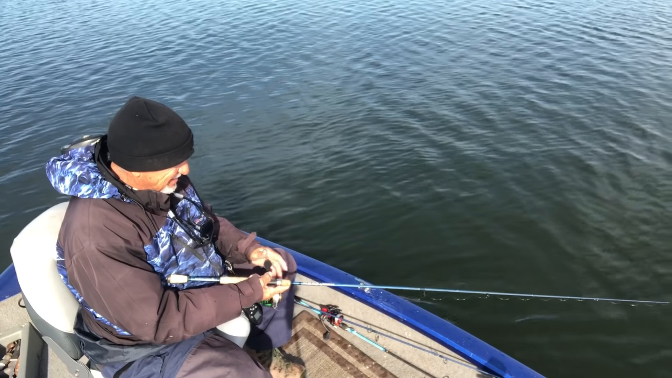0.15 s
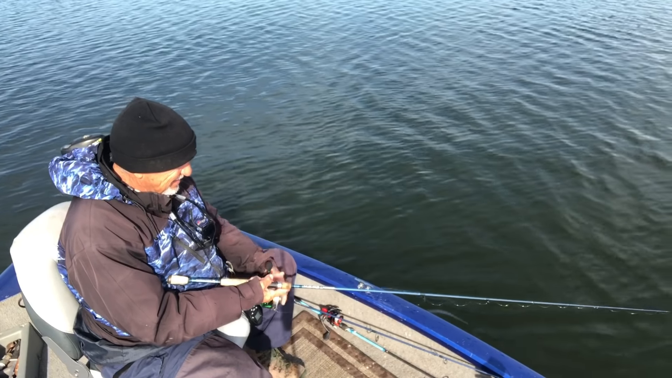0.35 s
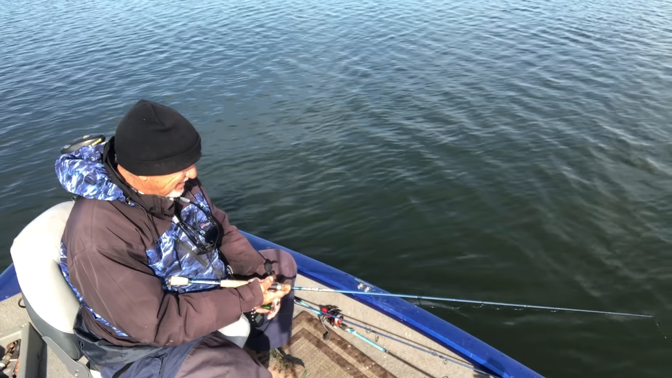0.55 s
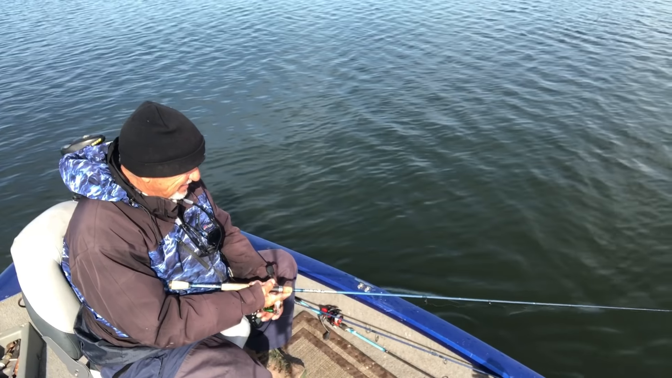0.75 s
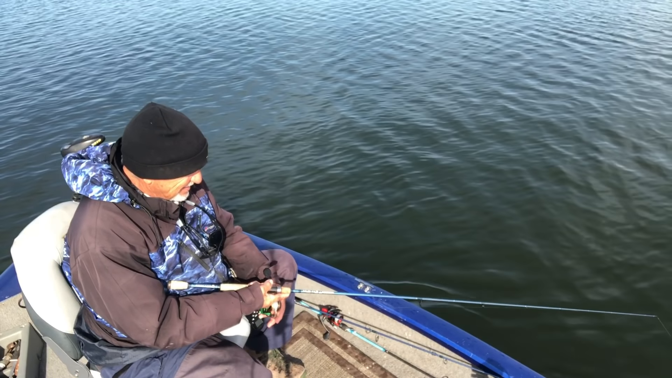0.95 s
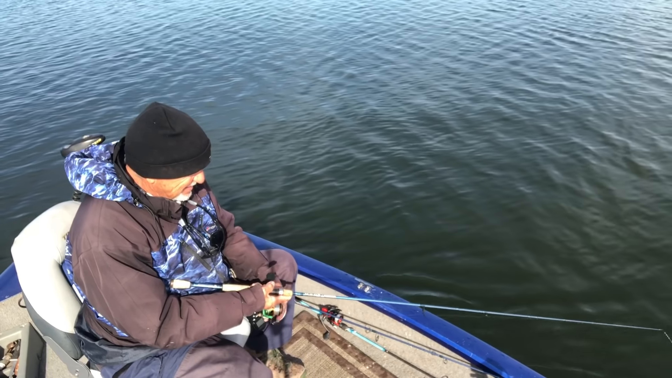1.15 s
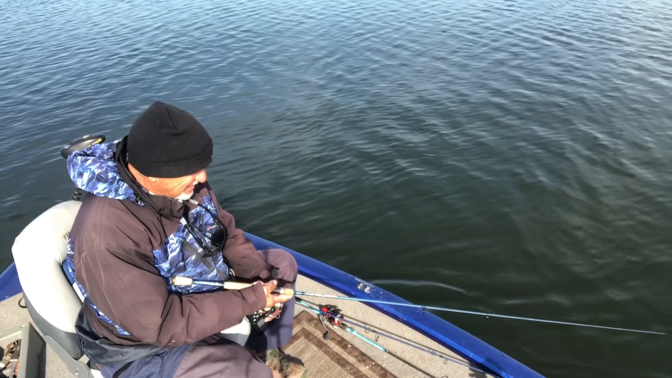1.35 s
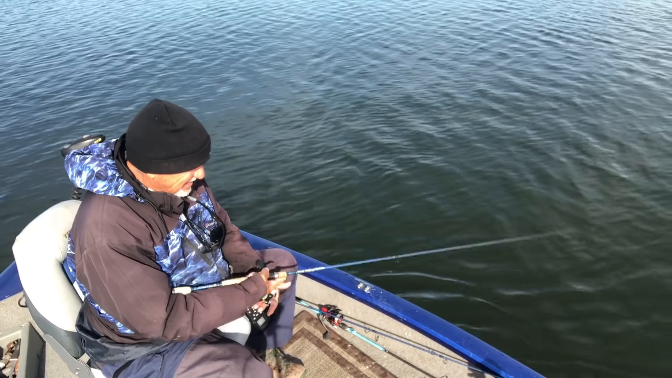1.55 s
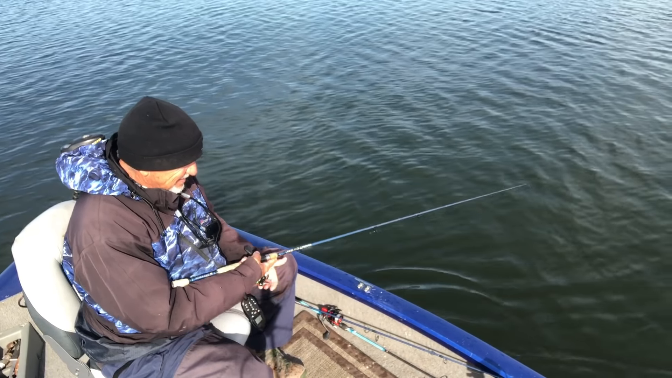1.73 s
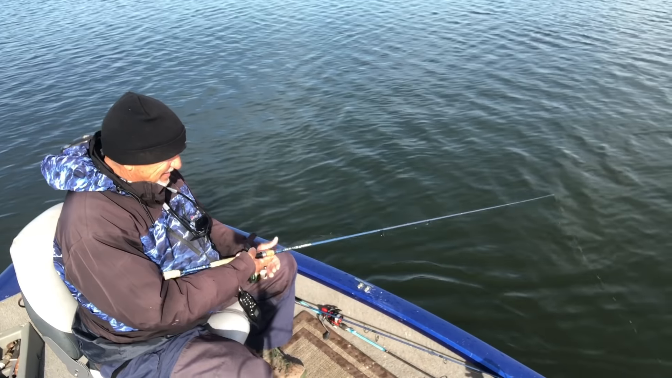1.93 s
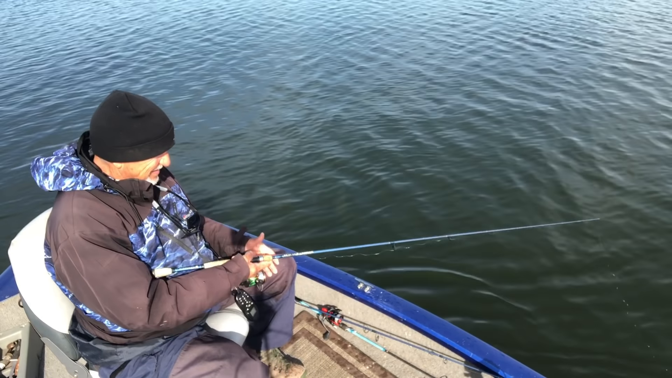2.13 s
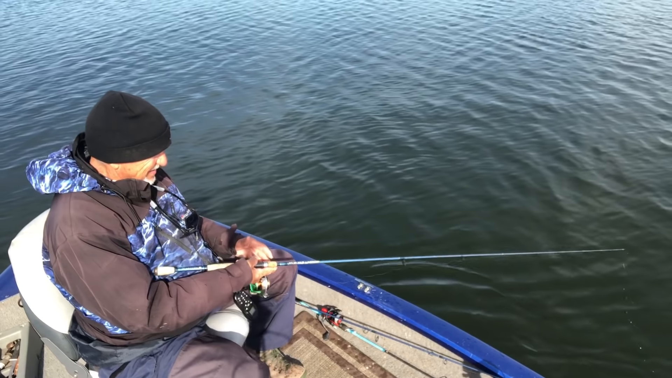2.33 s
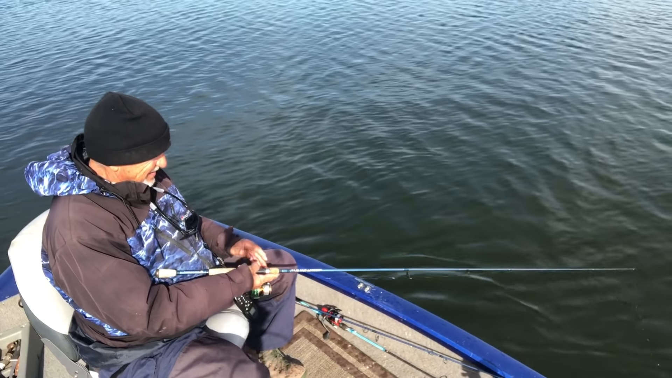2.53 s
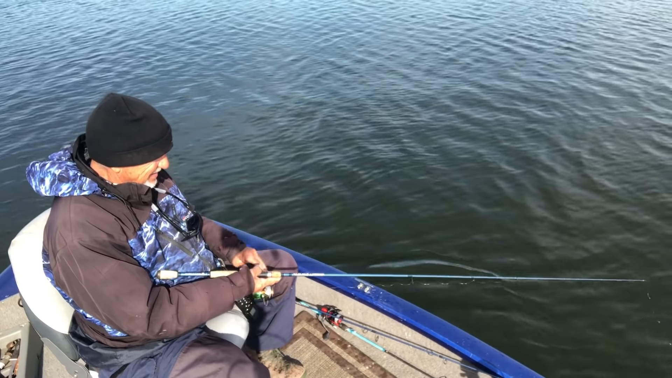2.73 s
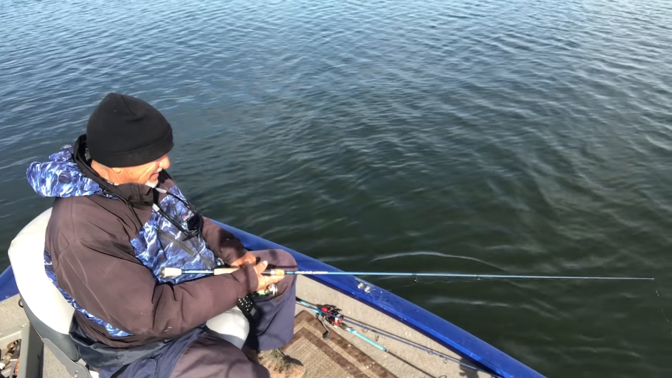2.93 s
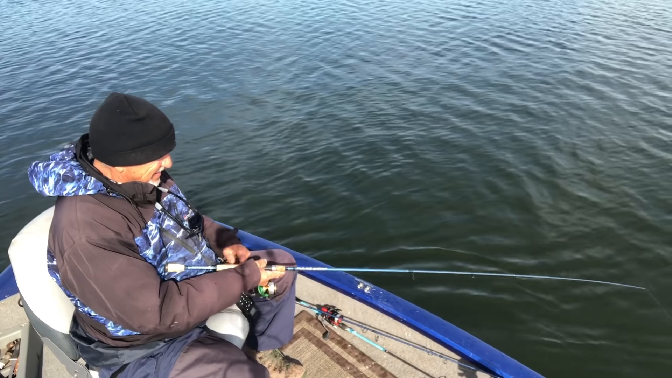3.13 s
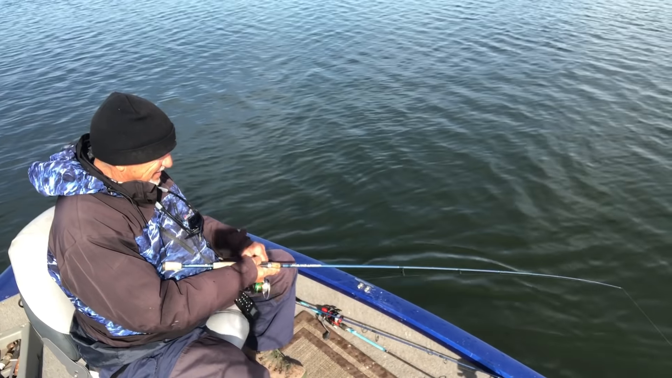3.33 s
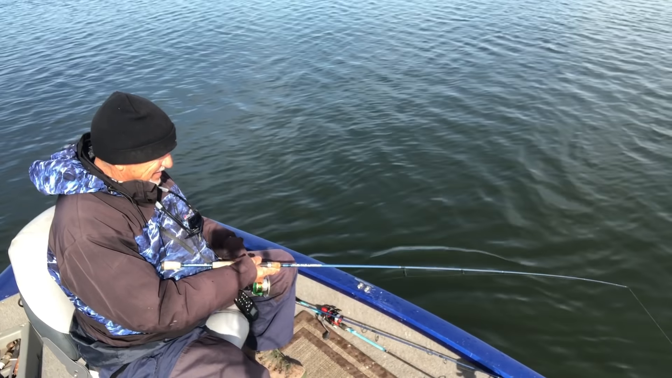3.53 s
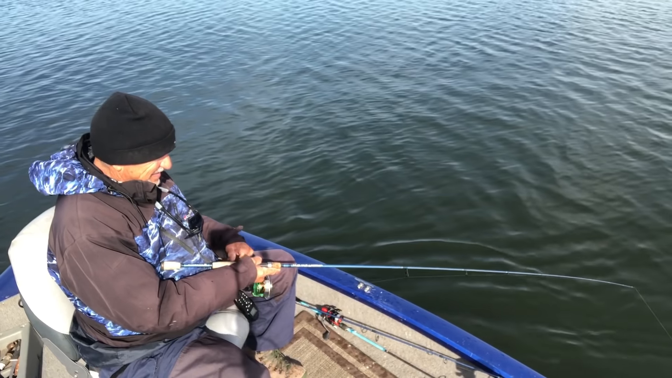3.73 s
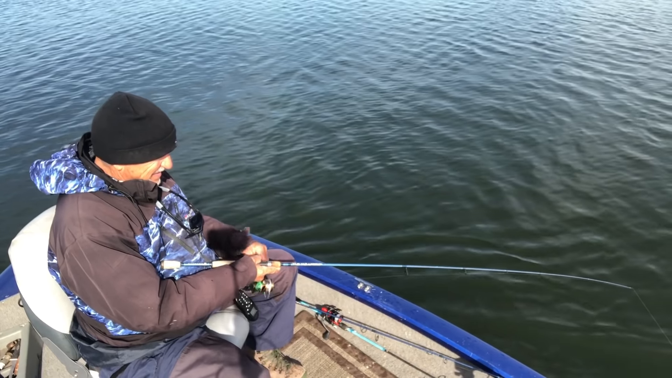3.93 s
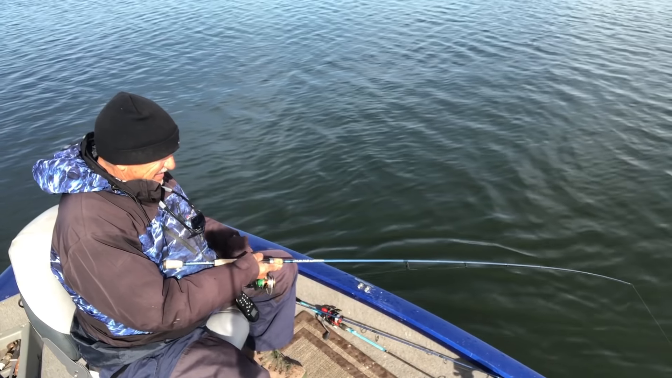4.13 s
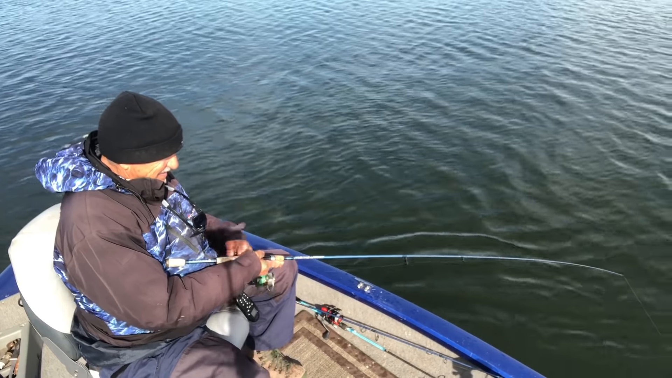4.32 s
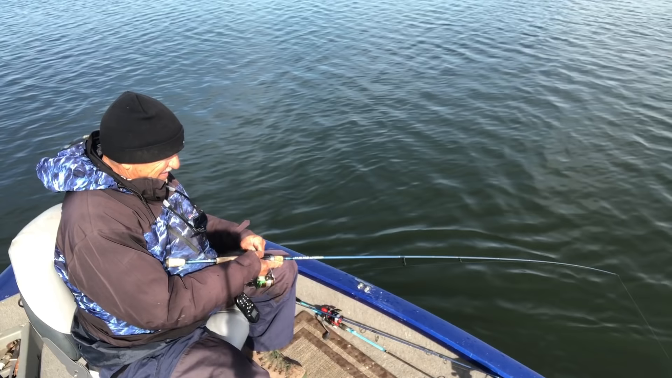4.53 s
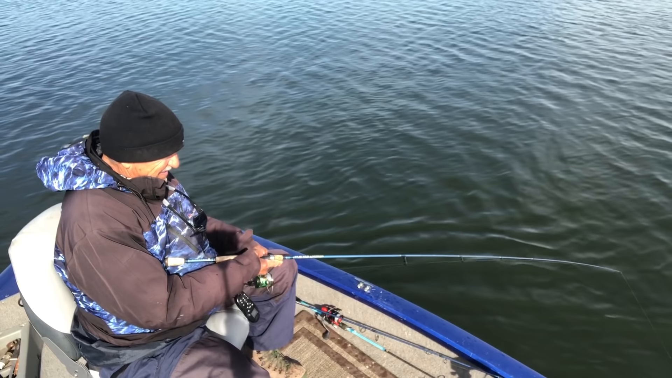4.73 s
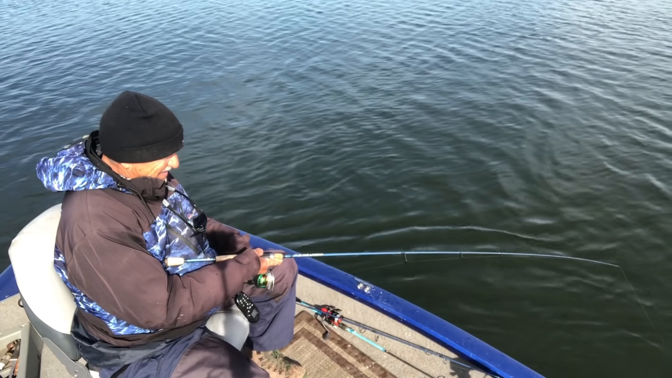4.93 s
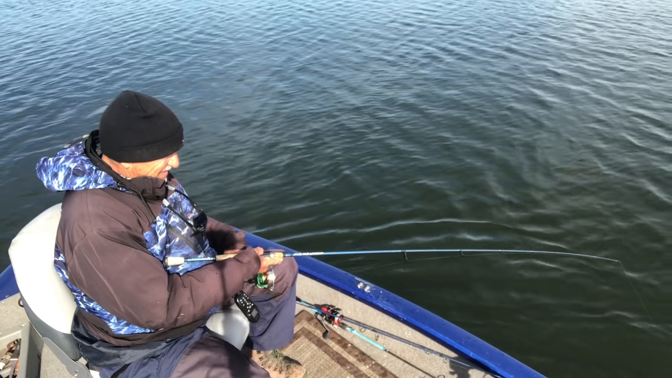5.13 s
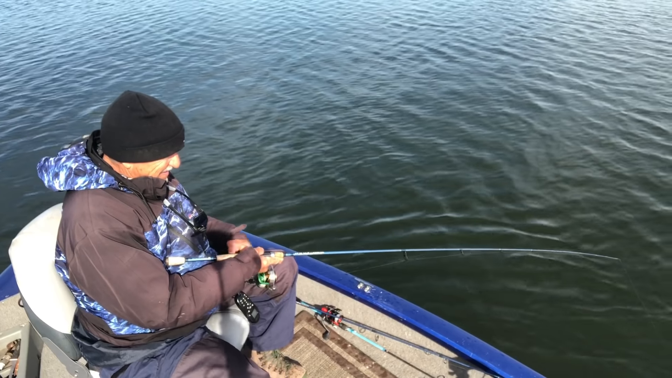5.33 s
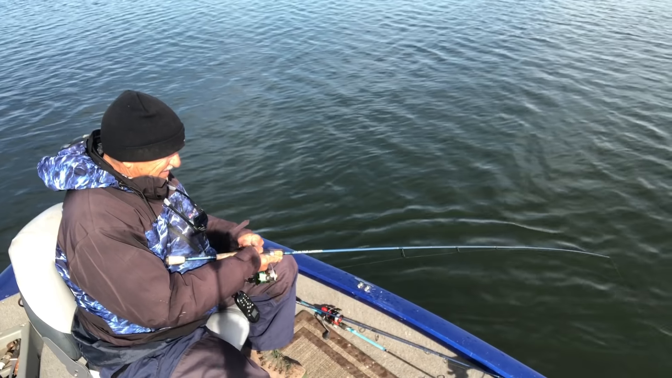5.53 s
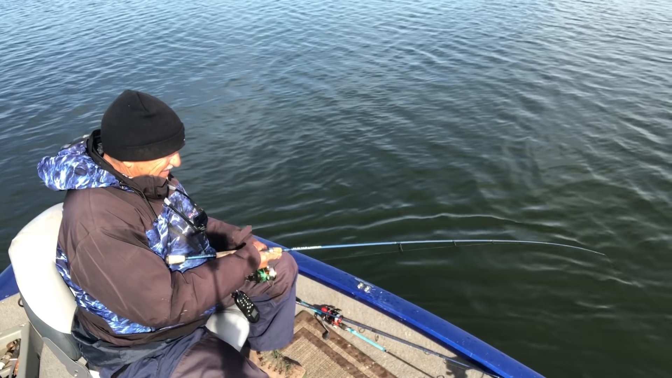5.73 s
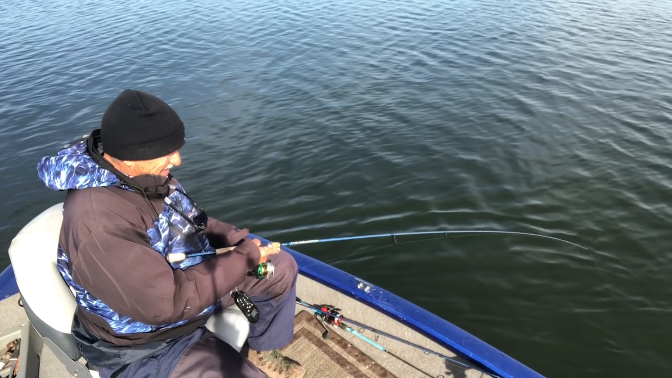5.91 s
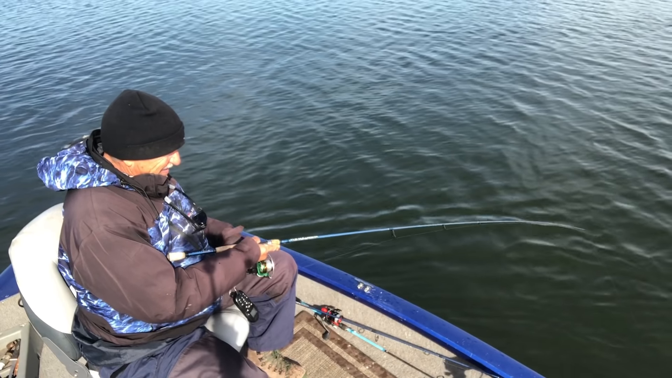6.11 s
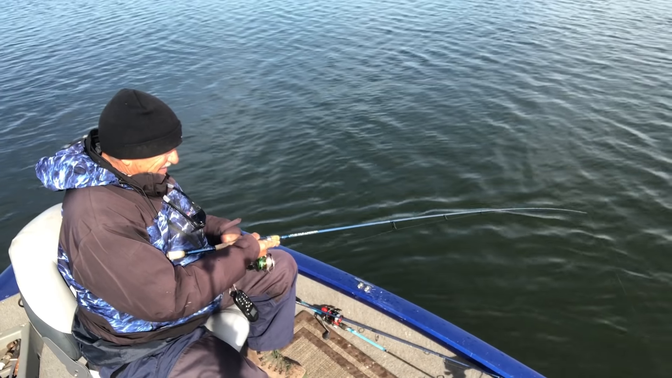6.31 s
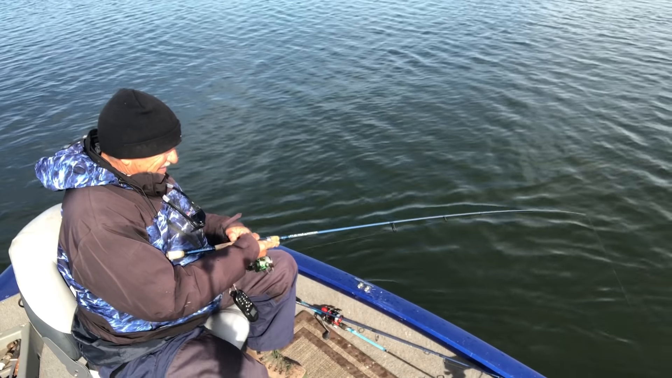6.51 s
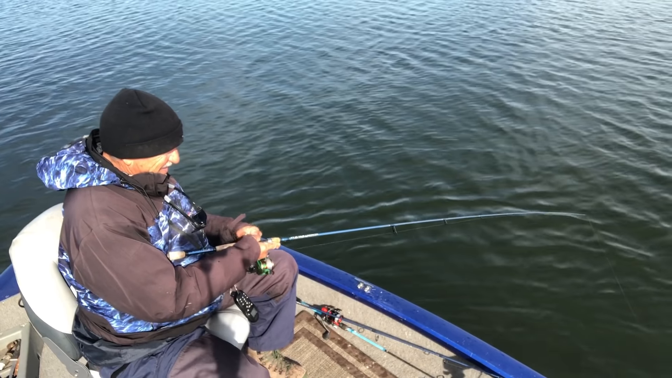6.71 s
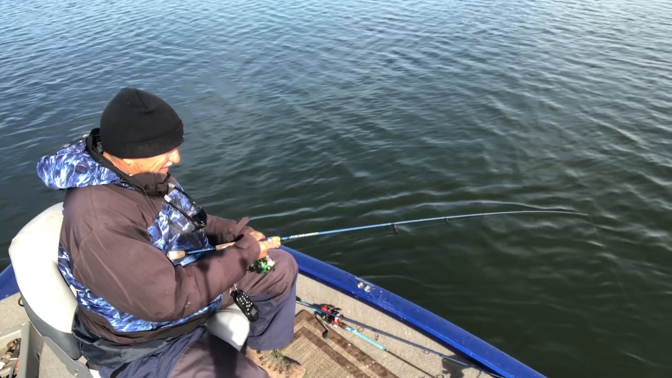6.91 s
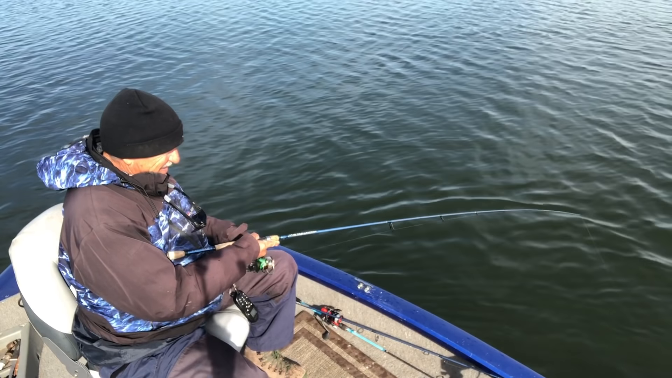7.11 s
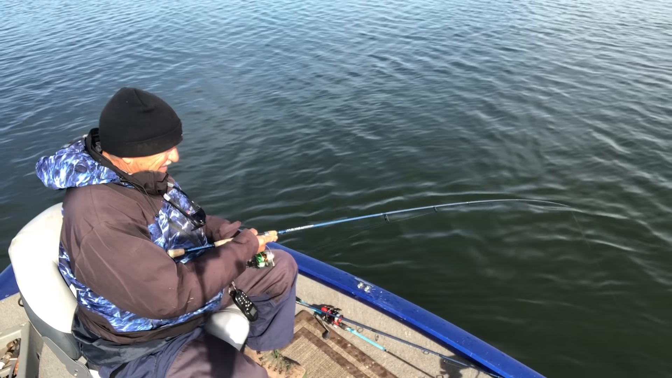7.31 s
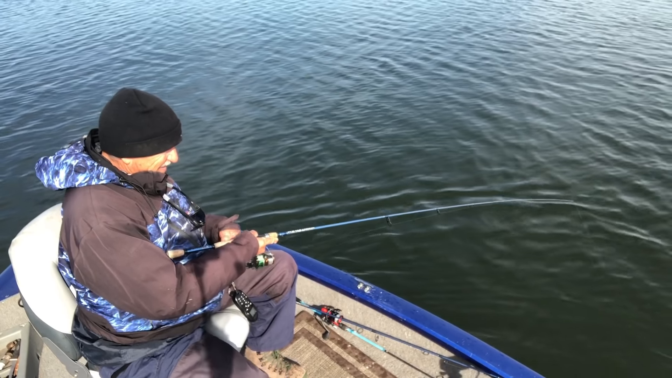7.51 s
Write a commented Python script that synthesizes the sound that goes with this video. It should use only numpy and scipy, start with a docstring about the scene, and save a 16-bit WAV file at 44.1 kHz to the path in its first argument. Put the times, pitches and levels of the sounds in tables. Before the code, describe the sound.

A fishing reel snaps shut, then is cranked in fast, dull, even knocks with one short pause, on a small boat.

```python
"""In a small boat on a lake, an angler snaps the reel's bail shut and cranks: five dull knocks a second,
with one short pause. Each knock crosses rod and hull as a dispersive bending wave, treble first, and
excites low resonances. Friction makes the line hiss and the sleeves rustle, trapped air pockets
resonate in plops against the hull, and an electric motor hums faintly."""
import sys
import numpy as np
from scipy import signal
from scipy.fft import rfft, irfft, next_fast_len
from scipy.io import wavfile
from scipy.ndimage import uniform_filter1d, map_coordinates

SR = 44100
rng = np.random.default_rng(int(sys.argv[2]) if len(sys.argv) > 2 else 0)


def store_pcm(level_fs):
    """Save levels as 16-bit WAV."""
    pcm = np.round(np.clip(level_fs, -1, 1) * 32767).astype(np.int16)
    wavfile.write(sys.argv[1], SR, np.atleast_2d(pcm).T)


N = 337806


def amp(db):
    """Amplitude grows tenfold for every 20 dB."""
    return 10 ** (np.asarray(db) / 20)


def unit(x):
    """Normalisation to an rms of 1."""
    return x / np.sqrt(np.mean(x ** 2) + 1e-20)


def fade(t, t60):
    """Exponential damping: 60 dB down after t60 seconds."""
    return np.exp(-np.log(1000) * t / t60)


def wobble(rate):
    """Smooth random fluctuation: a spline through rate random values a second."""
    knots = rng.standard_normal(int(N * rate / SR) + 4)
    return map_coordinates(knots, [np.arange(N) * rate / SR])


def noise(spectrum, size=N):
    """Spectral shaping: white noise is filtered by (Hz, dB) points and scaled to an rms of 1."""
    m = next_fast_len(size)
    hz, db = np.transpose(spectrum)
    gain = amp(np.interp(np.log(np.fft.rfftfreq(m, 1 / SR) + 1), np.log(hz), db))
    return unit(irfft(rfft(rng.standard_normal(m)) * gain, m)[:size])


def add(track, s, sound):
    """Superposition: a sound adds to the track from s seconds on."""
    part = track[max(round(s * SR), 0):][:len(sound)]
    part += sound[:len(part)]


# Spectrum of the steady background noise, duller above 8 kHz.
# Each row: frequency in Hz, relative spectral density in dB.
BACKGROUND_SPECTRUM = [(25, -27), (59, -3), (160, -4), (340, -11), (510, -15), (850, -20), (1320, -26),
                       (2400, -27), (5800, -28.5), (7800, -30), (8400, -33), (15800, -38)]

def background(level_db, swell_db):
    """Broadband noise swells gently under slow amplitude modulation."""
    return amp(level_db + swell_db * wobble(6)) * noise(BACKGROUND_SPECTRUM)


# Envelope of the motor's hum. Each row: time in seconds, level in dB.
MOTOR_LEVELS = [(2.1, -83), (2.35, -51.5), (5.6, -50.5), (6.1, -54), (6.8, -46), (7.66, -50)]

def motor(hz, waver):
    """Periodic vibration of the motor radiates one faint tone, wavering in frequency and level."""
    phase = 2 * np.pi * np.cumsum(hz * (1 + waver * wobble(5))) / SR
    level_db = np.interp(np.arange(N) / SR, *np.transpose(MOTOR_LEVELS))
    return amp(level_db + wobble(16)) * unit(np.sin(phase))


# Air pockets. Each row: start in seconds, peak level in dB, pitch in Hz, 60 dB decay time in seconds.
AIR_POCKETS = [(.085, -48, 520, 0.054), (.44, -42.5, 470, 0.029), (1.148, -44.5, 770, 0.0142),
               (1.153, -36.5, 492, 0.036), (3.8905, -42.5, 715, 0.0135), (3.895, -36.5, 500, 0.025),
               (6.604, -42, 750, 0.0244), (6.608, -35, 498, 0.03)]

def plops(rise_s):
    """Bubble resonance: air trapped by ripples against the hull rings as a damped oscillator."""
    out, t = np.zeros(N), np.arange(SR // 5) / SR
    for s, db, hz, t60 in AIR_POCKETS:
        pocket = np.sin(2 * np.pi * hz * t) * fade(t, t60) * (1 - np.exp(-t / rise_s))
        add(out, s, amp(db) * pocket / np.abs(pocket).max())
    return out


# Spectrum of rubbing cloth. Each row: frequency in Hz, relative spectral density in dB.
CLOTH_SPECTRUM = [(240, -27), (500, 2), (800, -2), (1300, 0), (2000, -5.5), (4000, -4), (6500, -6.5),
                  (10000, -12.5), (15800, -21)]
# Arm movements. Each row: time of greatest speed in seconds, level in dB, rise and fall in seconds.
ARM_MOVES = [(.32, -56, 0.083, 0.45), (.99, -57, 0.057, 0.028), (1.65, -48, 0.09, 0.13),
             (1.91, -56.5, 0.063, 0.43)]
SWISH_RANGE_DB = 10  # drop in level one rise before the peak, or one fall after it

def sleeves(grain_db):
    """Friction in the jacket's cloth makes noise that swells and dies away with each arm movement."""
    t, motion = np.arange(N) / SR, np.zeros(N)
    for s, db, rise, fall in ARM_MOVES:
        from_peak = np.maximum((s - t) / rise, (t - s) / fall)
        motion += amp(db - SWISH_RANGE_DB * from_peak)
    return motion * unit(noise(CLOTH_SPECTRUM) * amp(grain_db * wobble(150)))


def patchy(x, depth_db):
    """Random modulation in time and frequency: short patches of gain, a few hundred Hz wide."""
    spectra = signal.stft(x, nperseg=512)[2]
    field = uniform_filter1d(rng.standard_normal(spectra.shape), size=4, axis=0)
    field = uniform_filter1d(field, size=4, axis=1)
    return signal.istft(spectra * amp(depth_db * unit(field)), nperseg=512)[1][:N]


# Spectrum of the rubbing line. Each row: frequency in Hz, relative spectral density in dB.
LINE_SPECTRUM = [(1000, -13), (2000, -10.5), (3100, -8.5), (3700, -3.5), (5000, -2.5), (6300, -3),
                 (6950, 1), (7500, -3.5), (8100, -2), (9200, -11), (12000, -18), (15800, -24)]
# Spells of taut line. Each row: start and length in seconds, level in dB, growth in dB per second.
LINE_PULLS = [(2.978, 0.25, -56.5, -8), (3.209, 0.536, -50, -3), (3.722, 0.752, -53.5, 3),
              (4.464, .39, -56, -4), (4.9, 0.154, -57.5, -6)]
GRIP_S, SLACKEN_S = 0.022, 0.017  # the hiss sets in and stops

def taut_line(flutter_db, grain_db, patchy_db):
    """Sliding friction in the guides makes a fine, uneven hiss that follows the line's tension."""
    t, tension = np.arange(N) / SR, np.zeros(N)
    for s, length, db, growth in LINE_PULLS:
        taut = np.clip(np.minimum((t - s) / GRIP_S, (s + length - t) / SLACKEN_S), 0, 1)
        tension += taut * amp(db + growth * (t - s))
    hiss = patchy(noise(LINE_SPECTRUM), patchy_db)
    roughness = amp(grain_db * wobble(300) + flutter_db * wobble(40))
    return tension * unit(hiss * roughness)


# Slips of slack line. Each row: start and length in seconds, level in dB, starting pitch in Hz.
LINE_SLIPS = [(3.161, .014, -56, 13000), (3.178, .018, -54, 9970)]

def slack_line(scatter, fall_octaves_per_s):
    """Line slipping over a guide gives thin zips: falling tones with random frequency modulation."""
    out = np.zeros(N)
    for s, length, db, start_hz in LINE_SLIPS:
        t = np.arange(int(length * SR)) / SR
        hz = start_hz * 2 ** (-fall_octaves_per_s * t) * (1 + scatter * wobble(4000)[:len(t)])
        tone = unit(np.sin(2 * np.pi * np.cumsum(hz) / SR))
        add(out, s, amp(db) * np.sin(np.pi * t / length) * tone)
    return out


# Spectrum of an impact's crack. Each row: frequency in Hz, relative spectral density in dB.
CRACK_SPECTRUM = [(150, -27), (400, -1), (850, -13.5), (1150, -9.5), (1650, -18), (2200, -2), (3200, -5.5),
                  (4000, -1.5), (6000, 1), (7800, -4), (9000, -6.5), (11500, -6.5), (15800, -17)]
# Modes of the wire bail. Each row: frequency in Hz, relative level in dB, 60 dB decay time in seconds.
WIRE_MODES = [(437, -33, .1), (2154, -26, .07), (2626, -29, .07), (3771, -29, .06), (4377, -28, .06),
              (4797, -28, .06), (5333, -26, .06), (5652, -27, .06), (5946, -26, .06), (6225, -26, .06),
              (7890, -30, .06), (11912, -35, .19)]

def contact(db, t60, bright_hz, crack_db, ring_db):
    """An impact gives a crack and a damped, wiry ring; a soft contact acts as a low-pass filter."""
    t = np.arange(SR // 4) / SR
    crack = amp(crack_db) * noise(CRACK_SPECTRUM, size=len(t)) * fade(t, t60)
    ring = np.zeros(len(t))
    for hz, mode_db, mode_t60 in WIRE_MODES:
        strength = amp(mode_db + rng.normal(0, 2.4))
        ring += strength * fade(t, mode_t60) * np.sin(2 * np.pi * (hz * t + rng.random()))
    softness = np.exp(-2 * np.pi * bright_hz / SR)
    return amp(db) * signal.lfilter([1 - softness], [1, -softness], crack + amp(ring_db) * ring)


# Small pitched ticks. Each row: start in seconds, gain in dB, 60 dB decay time of the crack in seconds,
# treble cutoff in Hz, ring frequency in Hz.
PITCHED_TICKS = [(.581, -38, 0.029, 3000, 3000), (.877, -37, .03, 900, 1400),
                 (1.2328, -23, 0.0078, 1800, 1248), (4.607, -24.5, 0.039, 1600, 1780),
                 (5.223, -31.5, 0.021, 1600, 2400)]

def pitched_ticks(crack_db, ring_db, ping_db, ping_t60):
    """Damped oscillation gives each small tick a brief pitched ring, like a drip of water."""
    out, t = np.zeros(N), np.arange(SR // 4) / SR
    for s, db, t60, bright_hz, ring_hz in PITCHED_TICKS:
        ping = amp(db + ping_db) * np.sin(2 * np.pi * ring_hz * t) * fade(t, ping_t60)
        add(out, s, contact(db, t60, bright_hz, crack_db, ring_db) + ping)
    return out


SNAP_S, SNAP_DB, SNAP_T60, SNAP_BRIGHT_HZ = 1.925, -15, 0.038, 11000
SEAT_DB, SEAT_T60, SEAT_BRIGHT_HZ = 7, 0.037, 600  # the dull blow as the bail seats
REBOUND_S, REBOUND_DB, REBOUND_T60 = 0.032, -10.5, 0.047  # time and gain relative to the snap

def bail(crack_db, ring_db, count, chatter_s):
    """Repeated impact: the sprung bail chatters on its stop, seats in its frame and rebounds once."""
    out = np.zeros(N)
    contacts = SNAP_S + chatter_s * np.arange(count)
    for s in contacts:
        add(out, s, contact(SNAP_DB, SNAP_T60, SNAP_BRIGHT_HZ, crack_db, ring_db))
    seat = contact(SNAP_DB + SEAT_DB, SEAT_T60, SEAT_BRIGHT_HZ, crack_db, ring_db)
    rebound = contact(SNAP_DB + REBOUND_DB, REBOUND_T60, SNAP_BRIGHT_HZ, crack_db, ring_db)
    add(out, contacts[-1], seat)
    add(out, SNAP_S + REBOUND_S, rebound)
    return out


# Resonances and notches that colour the dull knock, summed with alternating signs.
# Each row: frequency in Hz, bandwidth in Hz, relative level in dB.
KNOCK_COLOUR = [(57, 14.9, -7), (82.3, 10.8, 0.5), (102.8, 10.1, -6), (114.6, 5.7, -12.5),
                (122.5, 9.6, -10.5), (135.6, 7.8, -3.5), (135.05, 17.8, -3), (154.4, 13.5, -18.5),
                (168.4, 13, -8.5), (178.8, 25.7, -3), (185.8, 45.7, -10), (248.6, 40.8, -4.5),
                (253, 50.8, -6.5), (308.6, 6.9, -19.5), (340.1, 45.7, -11), (356.1, 63.5, -13.5),
                (440, 3.3, -46), (469.5, 22.05, -23.5), (563, 30, -29), (662, 200, -35.5)]

def knock_response(f, travel_s, low_hz):
    """Resonance and dispersion shape a knock; travel_s is the bending wave's group delay at 100 Hz."""
    colour = sum((-1) ** k * amp(db) * 1j * f * width / (hz * hz - f * f + 1j * f * width)
                 for k, (hz, width, db) in enumerate(KNOCK_COLOUR))
    # bending waves speed up with the root of frequency, so every knock sweeps downward
    bending = np.exp(-4j * np.pi * travel_s * np.sqrt(100 * f))
    # the longest waves hardly radiate
    u = 1j * f / low_hz
    radiation = (u * u / (u * u + np.sqrt(2) * u + 1)) ** 2
    return -colour * bending * radiation


# Spectra of the hull's reverberation, a knock's first contact and the shaken gears.
# Each row: frequency in Hz, relative spectral density in dB.
BOOM_SPECTRUM = [(40, -32), (75, 14), (100, -24), (150, -9), (240, -5.5), (350, -18), (500, -18),
                 (900, -42), (2000, -84)]
TAP_SPECTRUM = [(200, 0), (700, 15), (1200, -5), (1800, -25), (4000, -28)]
GEAR_SPECTRUM = [(300, 9.5), (700, 1.5), (1300, 2), (1750, -5.5), (2300, -8.5), (6000, -9), (15000, -26.5)]
# Knocks of the crank. Each row: start in seconds, level in dB, contact hardness as a cutoff in Hz.
CRANK_KNOCKS = [(2.2169, -17.5, 870), (2.4369, -11.5, 1170), (2.6414, -10.7, 634), (2.8264, -17, 310),
                (3.0342, -10.5, 794), (3.2293, -12.6, 484), (3.4265, -16, 500), (3.6275, -11, 390),
                (3.8192, -14, 910), (4.0204, -11, 673), (4.21, -13, 530), (4.4045, -13.2, 500),
                (4.5997, -13, 450), (4.798, -13, 570), (4.9898, -12.5, 500), (5.184, -15, 400),
                (5.3852, -11.5, 890), (5.582, -13, 460), (5.7716, -20.9, 248), (5.962, -22.5, 180),
                (6.7098, -11.5, 664), (6.9207, -20, 203), (7.1129, -26.5, 149), (7.3053, -28.5, 159),
                (7.5657, -10.5, 1180)]

def reel_play(delay_s, tick_db, t60, bright_hz, crack_db, ring_db):
    """Backlash: the reel ticks at each knock's greatest swing, the louder the harder the knock."""
    out = np.zeros(N)
    for s, db, hard_hz in CRANK_KNOCKS:
        tick = contact(db + tick_db, t60, bright_hz, crack_db, ring_db)
        add(out, s + delay_s, hard_hz / 1000 * tick)
    return out


def crank(boom_db, boom_t60, tap_db, tap_t60, rattle_db, rattle_t60, rattle_rise_s):
    """Impulse excitation: harder contacts give brighter knocks; the hull booms and the gears rattle."""
    out, size = np.zeros(N), SR // 2
    t, f = np.arange(size) / SR, np.fft.rfftfreq(size, 1 / SR)
    body = knock_response(f, travel_s=0.00408, low_hz=36.7)
    # reverberation builds up only once the first waves have crossed the hull
    build_up = 1 - np.exp(-(t / .06) ** 3)
    shake = amp(rattle_db) * fade(t, rattle_t60) * (1 - np.exp(-t / rattle_rise_s))
    for s, db, hard_hz in CRANK_KNOCKS:
        knock = irfft(body / (1 + 1j * f / hard_hz) ** 2, size)
        boom = amp(boom_db) * noise(BOOM_SPECTRUM, size) * fade(t, boom_t60) * build_up
        tap = amp(tap_db) * hard_hz / 1000 * fade(t, tap_t60) * noise(TAP_SPECTRUM, size)
        rattle = shake * noise(GEAR_SPECTRUM, size)
        add(out, s, amp(db) * (knock / np.abs(knock).max() + boom + tap + rattle))
    return out


def scene():
    """Superposition of reel, angler, boat and background in one channel."""
    mix = crank(boom_db=-7.5, boom_t60=0.27, tap_db=-34.5, tap_t60=0.086,
                rattle_db=-30.5, rattle_t60=0.34, rattle_rise_s=0.012)
    mix += taut_line(flutter_db=2.05, grain_db=2.0, patchy_db=2.0)
    mix += slack_line(scatter=0.108, fall_octaves_per_s=13)
    mix += reel_play(delay_s=0.018, tick_db=-30, t60=0.022, bright_hz=9000, crack_db=-8.5, ring_db=-5.5)
    mix += bail(crack_db=-5.5, ring_db=4, count=4, chatter_s=0.0025)
    mix += pitched_ticks(crack_db=-5, ring_db=-6, ping_db=-19.5, ping_t60=0.071)
    mix += sleeves(grain_db=0.6)
    mix += plops(rise_s=0.0026)
    mix += motor(hz=96.7, waver=0.011)
    mix += background(level_db=-51.5, swell_db=1.12)
    return mix[None]


TOP_HZ = 15750

def record(dry):
    """Band limiting: an ideal low-pass filter passes nothing above TOP_HZ."""
    m = next_fast_len(N + SR // 2)
    passband = np.fft.rfftfreq(m, 1 / SR) < TOP_HZ
    return irfft(rfft(dry, m) * passband, m)[..., :N]


dry = scene()
out = record(dry)
store_pcm(out)
```